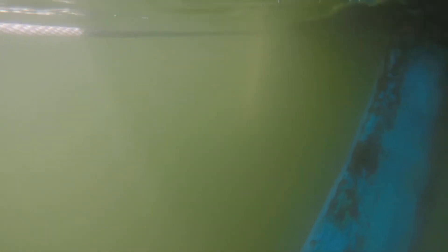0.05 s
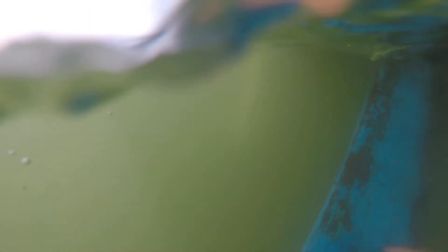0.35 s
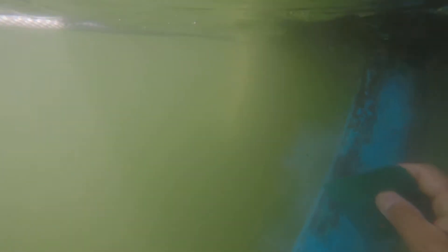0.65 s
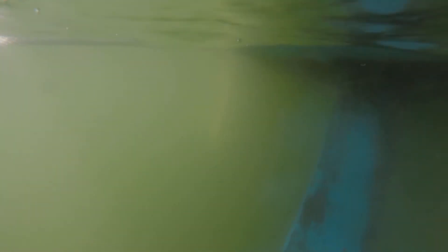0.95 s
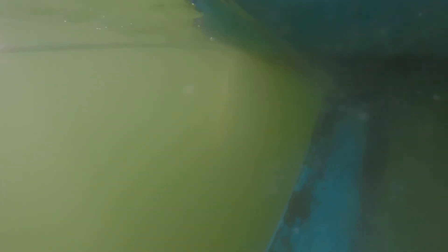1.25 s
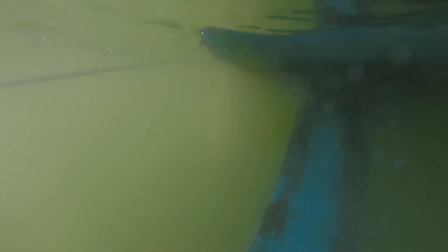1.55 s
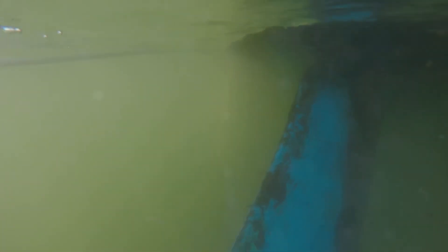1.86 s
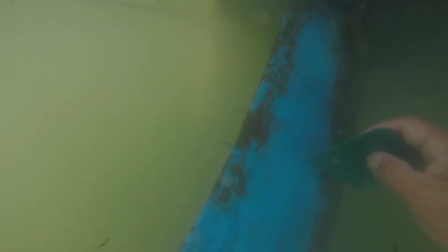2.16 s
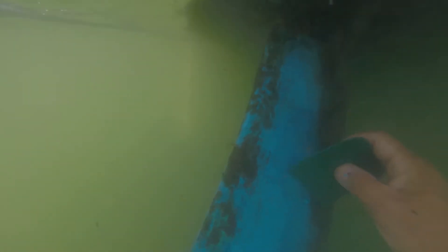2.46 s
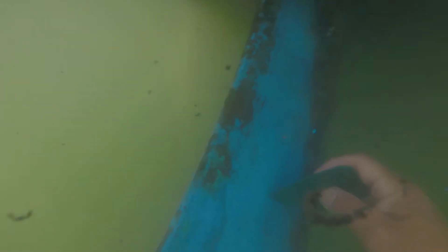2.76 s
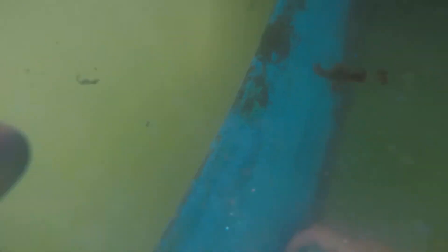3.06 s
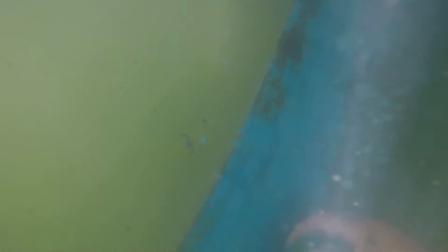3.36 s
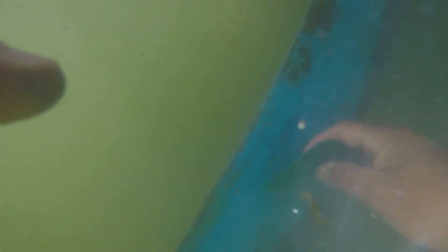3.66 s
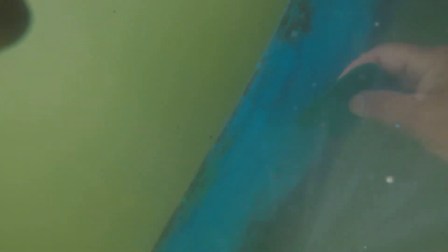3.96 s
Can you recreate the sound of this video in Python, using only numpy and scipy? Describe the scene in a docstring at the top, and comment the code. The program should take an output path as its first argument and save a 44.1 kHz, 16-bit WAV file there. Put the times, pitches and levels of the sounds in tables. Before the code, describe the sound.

Muffled water rumbles and gurgles around a boat hull, heard underwater from inside a camera housing. Bubbles blip and dull knocks come irregularly, a hand scraper clicks a few times, and near the end fingers bump and rub the housing.

```python
"""Water surges and gurgles against a droning boat hull, heard under water from inside a camera housing.
Wavelets knock on the hull, and trapped air rings as bubbles, each a damped oscillator with its own pitch.
A hand scraper clicks on the hull by impact. Near the end fingers bump the housing and rub it in low,
uneven pulses of stick-slip friction, and the hiss of the water fades."""
import sys
import numpy as np
from scipy import signal
from scipy.fft import rfft, irfft, next_fast_len
from scipy.io import wavfile
from scipy.ndimage import uniform_filter1d, map_coordinates

SR = 44100
rng = np.random.default_rng(int(sys.argv[2]) if len(sys.argv) > 2 else 0)


def to_wav(s):
    """Save 16-bit WAV."""
    ch = np.atleast_2d(s).T  # columns
    pcm = np.round(np.clip(ch, -1, 1) * 32767)  # PCM
    wavfile.write(sys.argv[1], SR, pcm.astype(np.int16))


N = 176400


def amp(db):
    """Amplitude ratio of a level in decibels."""
    return 10 ** (np.asarray(db) / 20)

def unit_rms(x):
    """Normalisation to rms 1."""
    return x / np.sqrt(np.mean(x ** 2) + 1e-20)

def unit_peak(x):
    """Normalisation to peak 1."""
    return x / (np.abs(x).max() + 1e-20)

def envelope(points):
    """Gain per sample, interpolated in decibels between (time_s, level_db) points."""
    return amp(np.interp(np.arange(N) / SR, *np.transpose(points)))

def add(track, start_s, x):
    """Superposition: x is summed into the track from start_s on."""
    i = max(0, round(start_s * SR))
    track[i:i + len(x)] += x[:max(0, N - i)]

def response(spectrum, hz):
    """Magnitude response through (frequency_hz, gain_db) points on a log frequency axis."""
    corner_hz, db = np.transpose(spectrum)
    return amp(np.interp(np.log(hz + 1), np.log(corner_hz + 1), db))

def noise(spectrum):
    """Spectral shaping of white noise, rms 1."""
    size = next_fast_len(N + 8192)
    shaped = rfft(rng.standard_normal(size)) * response(spectrum, np.fft.rfftfreq(size, 1 / SR))
    return unit_rms(irfft(shaped, size)[:N])

def steady(x, span_s):
    """Division by the running rms evens out swells slower than span_s."""
    power = uniform_filter1d(np.abs(signal.hilbert(x)) ** 2, max(2, int(span_s * SR)))
    return unit_rms(x / np.sqrt(np.abs(power) + 1e-6))

def filtered(x, spectrum, size=2048):
    """Minimum-phase filtering: folding the cepstrum makes the response causal."""
    cepstrum = irfft(np.log(response(spectrum, np.fft.rfftfreq(size, 1 / SR)) + 1e-6))
    cepstrum[1:size // 2] *= 2
    cepstrum[size // 2 + 1:] = 0
    return signal.fftconvolve(x, irfft(np.exp(rfft(cepstrum))))[:len(x)]

def ring(t, hz, t60_s, attack_s, octaves_per_s=0):
    """Damped oscillator: a sine that decays exponentially and may glide in pitch."""
    phase = 2 * np.pi * np.cumsum(hz * 2 ** (octaves_per_s * t)) / SR
    return np.sin(phase) * np.exp(-np.log(1000) * t / t60_s) * (1 - np.exp(-t / attack_s))

def burst(t, t60_s, spectrum):
    """Broadband transient: exponentially decaying noise, filtered, peak 1."""
    decaying = rng.standard_normal(len(t)) * np.exp(-np.log(1000) * t / t60_s)
    return unit_peak(filtered(decaying, spectrum))

def pulse_runs(runs, spectrum, arch_power, pulses_per_s=320, spread_db=1.5):
    """Shot noise: random pulses over faint hiss, swelling and fading in each run."""
    out = np.zeros(N)
    pulses = (rng.random(N) < pulses_per_s / SR) * amp(spread_db * rng.standard_normal(N))
    grain = steady(filtered(pulses + 0.14 * rng.standard_normal(N), spectrum), span_s=0.011)
    for start_s, length_s, db in runs:
        progress = np.clip((np.arange(N) / SR - start_s) / length_s, 0, 1)
        out += amp(db) * np.abs(np.sin(np.pi * progress)) ** arch_power * grain
    return out


# Swell of the passing water: time_s, level_db
SURGE_LEVELS = [(0, -16), (.24, -16), (.34, -11.5), (.8, -23.5), (1.1, -23), (1.42, -26.5), (1.75, -14),
                (2.2, -17), (2.95, -16.5), (3.09, -9.5), (3.25, -31), (3.44, -9), (3.7, -24.5), (4, -18)]
# Its deep rumble: frequency_hz, gain_db
SURGE_SPECTRUM = [(10, 3.5), (32, 6.5), (58, -1.5), (75, -1), (130, -60), (400, -94)]

def surge():
    """Flow noise: passing water makes a low rumble that swells and ebbs."""
    return envelope(SURGE_LEVELS) * steady(noise(SURGE_SPECTRUM), span_s=0.11)

# Swell of the hull's drone: time_s, level_db
DRONE_LEVELS = [(.5, -25), (.9, -35), (1.4, -29), (1.9, -19), (2.6, -23.5), (2.9, -38), (3.5, -24.5),
                (3.66, -30)]
# Its single peak: frequency_hz, gain_db
DRONE_SPECTRUM = [(50, -29.5), (76, -16.5), (87, 9.5), (99, -10.5), (300, -75)]

def hull_drone():
    """Narrow-band noise: the hull's drone is heard as a wavering pitch near 87 Hz."""
    return envelope(DRONE_LEVELS) * steady(noise(DRONE_SPECTRUM), span_s=0.44)

# Soft wash of the water: time_s, level_db
WASH_LEVELS = [(0, -48), (1.65, -50), (2, -49), (3.04, -50), (3.5, -58.5), (4, -68.5)]
# Its broad band: frequency_hz, gain_db
WASH_SPECTRUM = [(650, 4), (1250, 3.5), (2400, -7), (3200, -13.5), (5000, -11.5), (7000, -15), (12000, -32),
                 (15500, -66)]
# Fine fizz: time_s, level_db
FIZZ_LEVELS = [(.48, -63), (.7, -58.5), (1.1, -62.5), (1.45, -59), (1.72, -71), (1.9, -57), (2.5, -64),
               (2.8, -61), (3.35, -68), (3.9, -92.5)]
# Its treble band: frequency_hz, gain_db
FIZZ_SPECTRUM = [(6000, -19), (8600, -0.5), (9700, -2.5), (11200, -10.5), (15000, -56.5)]

def water_hiss(flutter_db=1.9, flutters_per_s=63):
    """Random amplitude modulation makes a fine fizz flutter above a broadband wash."""
    wander = map_coordinates(rng.standard_normal(N), [np.arange(N) * flutters_per_s / SR])
    wash = envelope(WASH_LEVELS) * noise(WASH_SPECTRUM)
    fizz = envelope(FIZZ_LEVELS) * unit_rms(amp(flutter_db * wander) * noise(FIZZ_SPECTRUM))
    return wash + fizz

# Gurgling at the waterline: time_s, level_db
GURGLE_LEVELS = [(0, -21.5), (.85, -30), (1.1, -25), (1.4, -29), (2.05, -24), (2.45, -32.5), (2.8, -25),
                 (3.12, -30), (3.45, -18.5), (3.6, -37.5), (4, -43.5)]
# Churning water: frequency_hz, gain_db
CHURN_SPECTRUM = [(70, 2.5), (120, -4), (180, 8.5), (270, -5.5), (490, -4.5), (620, -17), (760, -26.5),
                  (1500, -70.5)]
# Transmission through the housing: frequency_hz, gain_db
HOUSING_SPECTRUM = [(380, -0.5), (490, 1.5), (720, -5.5)]

def gurgle(pockets_per_s=130, centre_hz=257.3, t60_cycles=20.9, churn_db=-3.5):
    """Bubble resonance: many large air pockets ring low and briefly over the churning water."""
    churn = steady(noise(CHURN_SPECTRUM), span_s=0.073)
    pockets, t = np.zeros(N), np.arange(SR // 8) / SR
    for when, pitch, strength, bend in rng.random((int(pockets_per_s * N / SR), 4)):
        ratio = np.exp(0.7666 * (2 * pitch - 1))
        hz = centre_hz * ratio
        gain = amp(-1.5 * np.log(strength + 0.0078)) / ratio ** 0.69  # lower pockets are louder
        tone = ring(t, hz, t60_cycles / hz, attack_s=0.0025, octaves_per_s=6 * (bend - .5))
        add(pockets, when * N / SR, gain * tone)
    ringing = steady(filtered(pockets, HOUSING_SPECTRUM), span_s=0.25)
    return envelope(GURGLE_LEVELS) * (ringing + amp(churn_db) * churn)

# Single bubbles: start_s, pitch_hz, peak_db, t60_s, glide_octaves_per_s
SINGLE_BUBBLES = [(.004, 840, -23.5, 0.084, -3.5), (.043, 1650, -28.5, 0.07, -3),
                  (.03, 664, -18.5, 0.084, -8), (0.094, 1044, -18.5, 0.093, 3.5),
                  (0.382, 1200, -28, 0.037, 1), (0.414, 1142, -35.5, 0.09, 4.5),
                  (.714, 619, -9.5, 0.057, 7.5), (1.923, 1270, -32, 0.066, -8), (1.945, 619, -26, 0.19, -2),
                  (2.022, 560, -26, 0.23, 4), (2.17, 2660, -33, 0.024, -12), (2.1, 434, -16.5, 0.054, 1.5),
                  (2.27, 538, -25.5, 0.22, -4), (2.885, 2560, -36.5, 0.016, -2),
                  (3.46, 478, -7.5, 0.094, 0.35)]
BUBBLE_ATTACK_S = 0.0014

def bubbles():
    """Mass-spring resonance: the air in a bubble is the spring, the water around it the mass."""
    out, t = np.zeros(N), np.arange(SR // 4) / SR
    for start_s, hz, db, t60_s, glide in SINGLE_BUBBLES:
        add(out, start_s, amp(db) * unit_peak(ring(t, hz, t60_s, BUBBLE_ATTACK_S, glide)))
    return out

# Sprays of tiny bubbles: start_s, length_s, typical_level_db
BUBBLE_SPRAYS = [(0.012, 0.076, -32), (0.341, 0.1, -48.5), (1.872, .36, -45.5)]

def sprays(bubbles_per_s=260, centre_hz=1554, t60_cycles=36.3):
    """Resonant frequency varies inversely with radius, so tiny bubbles ring high."""
    out, t = np.zeros(N), np.arange(SR // 4) / SR
    for start_s, length_s, db in BUBBLE_SPRAYS:
        for when, pitch, strength in rng.random((int(bubbles_per_s * length_s), 3)):
            hz = centre_hz * np.exp(0.72 * (2 * pitch - 1))
            gain = amp(db) * 2 * strength * np.sqrt(centre_hz / hz)
            add(out, start_s + when * length_s, gain * ring(t, hz, t60_cycles / hz, BUBBLE_ATTACK_S))
    return out

# Bursting foam: start_s, length_s, level_db
FOAM_RUNS = [(.012, .08, -44.5)]
# Its pops: frequency_hz, gain_db
FOAM_SPECTRUM = [(900, -12), (1800, 7.5), (6500, -12.5), (9500, -15.5), (15000, -46)]

def foam():
    """Shot noise: the independent pops of bursting foam merge into a fine crackle."""
    return pulse_runs(FOAM_RUNS, FOAM_SPECTRUM, arch_power=1)

# Ticks of grit: start_s, peak_db
GRIT_TICKS = [(0.0348, -34), (.257, -38), (.351, -47), (.459, -40.5), (1.171, -36), (1.833, -37.5),
              (1.844, -28), (2.564, -38.5)]
# A tick or crack: frequency_hz, gain_db
TICK_SPECTRUM = [(1500, -22), (7000, -9.5), (9300, 0.5), (15000, -24.5)]
TICK_T60_S = 0.009

def grit():
    """Brief contacts have wide spectra: grit ticks high in the treble."""
    out, t = np.zeros(N), np.arange(SR // 20) / SR
    for start_s, db in GRIT_TICKS:
        add(out, start_s, amp(db) * burst(t, TICK_T60_S, TICK_SPECTRUM))
    return out

# Blows of water and hand: start_s, peak_db, pitch_hz
SOFT_BLOWS = [(0.051, -12, 245), (.182, -6.5, 187.7), (0.204, -7, 192.6), (0.707, -5, 142.5),
              (.720, -8.5, 335), (0.935, -9.5, 236.5), (1.075, -10, 223), (1.179, -10.5, 189),
              (1.364, -19.5, 254), (2.095, -4, 127.8), (2.479, -10.5, 162.5), (2.562, -9, 150),
              (2.595, -7.5, 146), (2.678, -2, 165), (3.052, 1.5, 159.2), (3.185, -3.5, 186),
              (3.2, -4, 229.3), (3.418, -2.5, 196.4), (3.439, -5, 242), (3.5, -2, 91.8),
              (3.732, -12, 104.2)]
# Modes of a knock: pitch_ratio, level_db
BLOW_MODES = [(.47, -4), (1, -4), (1.45, -8.5), (2.3, -13.5)]

def knocks(attack_s=0.004, t60_cycles=11):
    """Modal response to a soft blow: a few low, heavily damped modes swell in and die away."""
    out, t = np.zeros(N), np.arange(SR // 4) / SR
    rise = 1 - np.exp(-t / attack_s)
    for start_s, db, hz in SOFT_BLOWS:
        body = np.zeros(len(t))
        for k, (ratio, mode_db) in enumerate(BLOW_MODES):
            gain = (-1) ** k * amp(mode_db + rng.normal(0, 2.0))
            mode_hz = hz * ratio * np.exp(rng.normal(0, 0.038))
            body += gain * ring(t, mode_hz, t60_cycles / hz, attack_s)
        add(out, start_s, amp(db) * unit_peak(body * rise))
    return out

# Light contacts: start_s, peak_db
HOUSING_TAPS = [(.054, -15.5), (0.712, -14.5), (0.723, -19), (0.7848, -19.5), (2.562, -20.5), (2.683, -27),
                (3.060, -27), (3.2015, -11), (3.422, -15.5), (3.5051, -11.5), (3.527, -12), (3.620, -29.5)]
# Their dull tone: frequency_hz, gain_db
TAP_SPECTRUM = [(480, 8.5), (750, -2), (1250, -1.5), (2000, -25.5), (3000, -30), (12000, -60)]

def taps(t60_s=0.032):
    """Structure-borne sound: light contacts pass through the housing as short, dull bursts."""
    out, t = np.zeros(N), np.arange(SR // 10) / SR
    for start_s, db in HOUSING_TAPS:
        add(out, start_s, amp(db) * burst(t, t60_s, TAP_SPECTRUM))
    return out

# Strikes of the scraper: start_s, ring_peak_db, hardness_db, crack_peak_db, ping_db
SCRAPER_STRIKES = [(0.5794, -11.5, -32, -34, -4), (0.587, -18, 0, -30.5, -11),
                   (0.6452, -27, 12, -43.5, -7.5), (1.3652, -22.5, -1, -34, -7),
                   (2.07, -27.5, 2, -38.5, -4), (2.0971, -3.5, -2, -46.5, -0.5)]
# Modes of a hard contact: frequency_hz, bandwidth_hz, level_db
STRIKE_MODES = [(1334, 247, 3.5), (2200, 1600, -7.5), (3730, 200, -11.5), (4440, 210, -1.5),
                (5930, 620, -24.5)]

def scraper_clicks():
    """Impact excitation: the edge cracks on hard growth and rings modes; the wider ones decay faster."""
    out, t = np.zeros(N), np.arange(SR // 20) / SR
    for start_s, ring_db, hardness_db, crack_db, ping_db in SCRAPER_STRIKES:
        body = np.zeros(len(t))
        for k, (hz, bandwidth_hz, mode_db) in enumerate(STRIKE_MODES):
            # hardness weights all modes above the first, ping only the fourth
            gain = (-1) ** k * bandwidth_hz * amp(mode_db + hardness_db * (k > 0) + ping_db * (k == 3))
            mode_hz = hz * np.exp(rng.normal(0, 0.008))
            t60_s = np.log(1000) / (np.pi * bandwidth_hz)
            body += gain * ring(t, mode_hz, t60_s, attack_s=0.00025)
        crack = burst(t, TICK_T60_S, TICK_SPECTRUM)
        add(out, start_s, amp(ring_db) * unit_peak(body) + amp(crack_db) * crack)
    return out

# Finger strokes on the housing: start_s, length_s, level_db
RUB_STROKES = [(3.2, 0.11, -15.5), (3.3, 0.025, -27.5), (3.71, 0.052, -41)]
# Their low tone: frequency_hz, gain_db
RUB_SPECTRUM = [(80, -14), (240, 11), (750, -10.5), (1400, -12), (3000, -31.5), (6500, -36.5), (8000, -51),
                (15000, -70.5)]

def finger_rubs():
    """Stick-slip friction: fingers catch and release on the housing in low, uneven pulses."""
    return pulse_runs(RUB_STROKES, RUB_SPECTRUM, arch_power=1.64)

# Runs of fine crackle ticks: centre_s, level_db (before filtering)
CRACKLE_RUNS = [(3.4243, -23), (3.4563, -24)]
# Their crisp tone: frequency_hz, gain_db
CRACKLE_SPECTRUM = [(5000, 6), (15000, -0.5)]

def crackles(gap_s=0.00535, falloff_db=6.5):
    """Impulse train under a Gaussian envelope: five evenly spaced ticks swell and fade."""
    out = np.zeros(N)
    for centre_s, db in CRACKLE_RUNS:
        for k in range(-2, 3):
            add(out, centre_s + k * gap_s, amp([db - falloff_db * k * k]))
    return filtered(out, CRACKLE_SPECTRUM)


def scene():
    """Linear superposition: all sources sum at one microphone inside the housing."""
    grains = finger_rubs() + foam()
    water = surge() + hull_drone() + water_hiss() + gurgle()
    transients = knocks() + taps() + bubbles() + sprays() + scraper_clicks() + grit() + crackles()
    return (grains + water + transients)[None]

def record(dry, cutoff_hz=15800):
    """Soft saturation rounds off the peaks, and an ideal low-pass filter limits the band."""
    rounded = dry / (1 + np.abs(dry) ** 8) ** (1 / 8)
    size = next_fast_len(N + 8192)
    passband = np.fft.rfftfreq(size, 1 / SR) < cutoff_hz
    return irfft(rfft(rounded, size) * passband, size)[..., :N]


dry = scene()
out = record(dry)
to_wav(out)
```